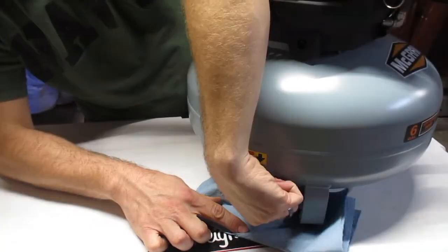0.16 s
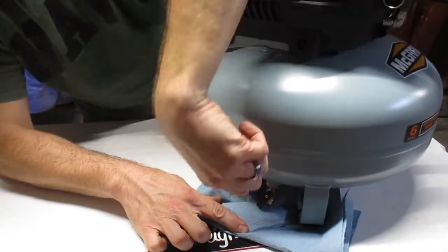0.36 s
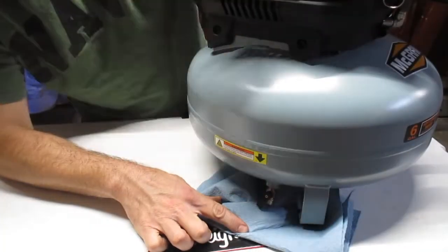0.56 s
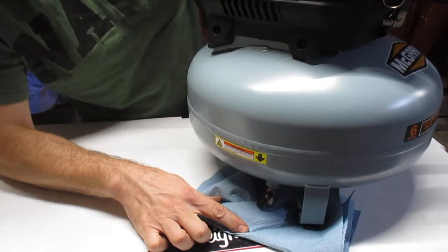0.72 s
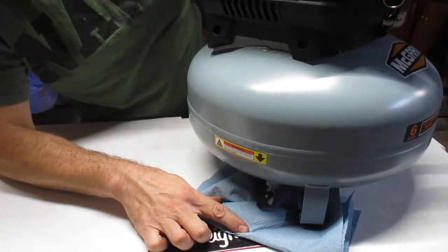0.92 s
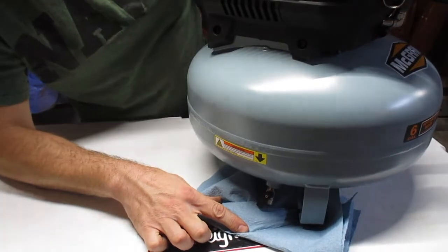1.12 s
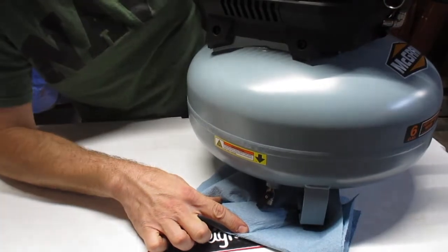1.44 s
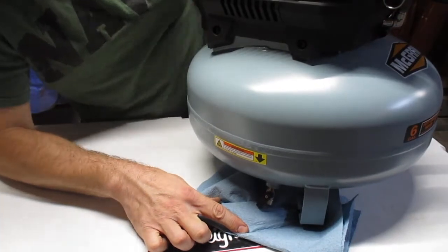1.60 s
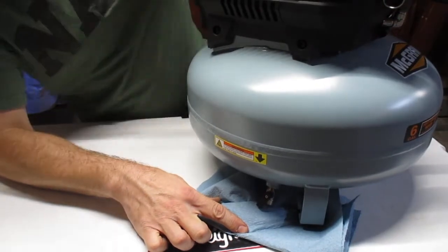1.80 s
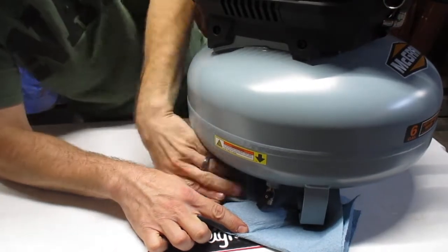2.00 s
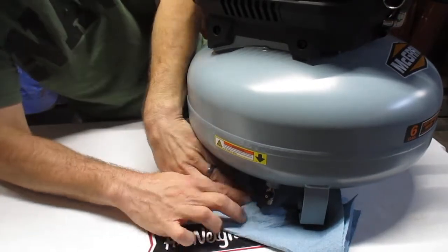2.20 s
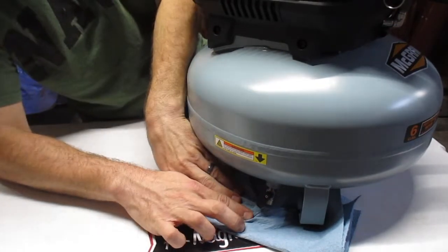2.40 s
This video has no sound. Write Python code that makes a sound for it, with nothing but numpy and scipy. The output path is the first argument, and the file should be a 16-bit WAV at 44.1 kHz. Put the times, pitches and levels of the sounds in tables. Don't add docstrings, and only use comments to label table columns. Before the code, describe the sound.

Bright jet of air escaping a compressor tank, sputtering with clicks and breathy whistles, then fading

```python
import sys
import numpy as np
from scipy import signal
from scipy.io import wavfile

SR = 44100
rng = np.random.default_rng(int(sys.argv[2]) if len(sys.argv) > 2 else 0)


def natural_amplitude(level_db):
    exponent = np.asarray(level_db, float) / 20
    return 10 ** exponent


def master(y):
    cut = np.clip(np.atleast_2d(y).T, -1, 1)
    pcm = np.round(cut * 32767)
    wavfile.write(sys.argv[1], SR, pcm.astype(np.int16))


N = 112454

# t/s, level/dB
JET_LEVEL = [(0, -26.5), (.115, -28.5), (.128, -23), (.155, -21), (.232, -25.5), (.24, -22), (.48, -23),
             (.535, -24), (.55, -23.5), (1.17, -25), (1.2, -20.5), (1.22, -25), (1.58, -26.5),
             (1.61, -27.5), (2.1, -29), (2.42, -30.5), (2.52, -34.5), (2.55, -36)]
# f/Hz, density/dB
JET_SPECTRUM = [(300, -67), (1000, -46), (2200, -30.5), (3000, -7), (4500, -10), (6300, -2.5),
                (10000, -4.5), (15000, -5)]
# f/Hz, added share/dB
SPECTRUM_STEPS = [(2380, 5), (10750, -5)]
# t/s, level/dB
ROAR_LEVEL = [(0, -33), (.11, -38), (.125, -28), (.23, -30.5), (.3, -30), (.8, -33.5), (1.02, -39.5),
              (1.12, -37.5), (1.19, -43.5), (1.23, -40.5), (1.58, -42), (1.605, -51), (1.69, -46.5),
              (2.0, -45.5), (2.2, -47.5), (2.25, -43.5), (2.31, -44.5), (2.35, -54)]
# f/Hz, density/dB
ROAR_SPECTRUM = [(30, -5), (100, -11.5), (250, -5.5), (700, -5), (1500, 0), (2300, 0.5), (4000, 1.5),
                 (8000, -9.5)]
# t/s, peak level/dB, ring weight/dB, thud weight/dB
DROPS = [
    (.2388, -7, -6, -12),
    (1.0622, -13, -8, -6),
    (1.213, -21, -1, 8),
    (1.3735, -7, -7, -5),
    (1.5206, -9, -7, -4),
    (1.6915, -11, -5, 0),
    (1.917, -5, -6, -1),
    (2.1208, -11, -8, -14),
    (2.1322, -3, -1, -12),
]
# f/Hz, level/dB, t60/s
DROP_MODES = [(2420, 0, .0075), (1150, -11, .006), (4600, -2, .0018), (6300, 1, .0025), (9000, -16, .002)]
DROP_MODE_SIGNS = [1, -1, -1, -1, 1]
# delay/s, level/dB
POP_ECHOES = [(.0042, -15), (.0097, -15), (.017, -19), (.026, -22)]
# lower f/Hz, upper f/Hz
POP_ECHO_BAND = (1800, 3000)
# start t/s, length t/s, first f/Hz, last f/Hz, level/dB
ORIFICE_WHISTLES = [(0.237, 0.16, 7700, 6300, -43), (.57, 0.078, 7000, 7400, -28.5),
                    (0.661, 0.3, 7650, 7050, -28), (1.0, 0.071, 7450, 6800, -28.5),
                    (1.065, .32, 7280, 6850, -31), (1.375, 0.19, 7000, 6500, -39),
                    (1.52, 0.082, 7200, 6700, -30), (1.6, 0.1, 6520, 5600, -35.5),
                    (1.694, 0.077, 6750, 6600, -31.5), (1.775, .08, 6500, 5640, -32),
                    (1.845, .065, 5730, 5300, -32), (1.96, 0.045, 6100, 6400, -33),
                    (2.01, 0.022, 9060, 9900, -26), (2.026, 0.034, 9700, 8150, -26.5),
                    (2.232, .04, 2750, 2530, -35.5)]
# start t/s, length t/s, first f/Hz, last f/Hz, level/dB
WATER_SURGES = [(.119, .03, 3300, 2890, -29), (.151, .021, 14000, 6960, -18.5),
                (.238, 0.23, 4000, 2737, -30), (.238, 0.18, 7600, 6040, -25.5),
                (.445, .055, 14500, 14700, -20), (.575, 0.069, 14550, 14470, -22),
                (.67, 0.3, 15000, 13920, -34), (1.14, 0.054, 11500, 12260, -33),
                (1.41, 0.069, 14000, 14450, -32), (1.52, 0.12, 9140, 8930, -32.5),
                (2.235, 0.046, 11200, 11000, -33)]
# t/s, level/dB
GAP_LEVEL = [(0, -60), (.11, -41), (.3, -46), (.4, -28), (.49, -32.5), (.53, -63), (.55, -34), (.8, -38),
             (1.16, -36.5), (1.33, -42.5), (1.68, -41), (1.7, -38.5), (1.9, -45), (2.02, -35.5), (2.1, -48),
             (2.55, -50)]
# f/Hz, width f/Hz, level/dB, share of the level's swing
GAP_MODES = [(2647, 520, 0, 1.0), (3980, 540, -5, 1)]
# start t/s, length t/s, first f/Hz, last f/Hz, level/dB
FOLD_HUMS = [
    (.9, 0.73, 1444, 1406, -44.5),
    (1.31, .07, 1420, 1335, -43),
    (1.62, 0.056, 1342, 1425, -47),
    (1.692, 0.18, 1406, 1368, -44.5),
    (1.92, 0.08, 1350, 1374, -46),
    (1.98, .06, 1355, 1480, -41),
    (2.165, 0.064, 1410, 1475, -50),
    (2.47, 0.065, 1424, 1400, -70),
]
# delay/s, level/dB
NEAR_WALLS = [(.0013, -31), (.0031, -23), (.0058, -25.5), (.0094, -20.5), (.0147, -15.5)]


def rms_one(x):
    return x / np.sqrt(np.mean(np.abs(x) ** 2) + 1e-20)


def in_time(rows):
    t, value = np.transpose(rows)
    return np.interp(np.arange(N) / SR, t, value)


def filtered(x, order, hz, kind):
    return signal.sosfilt(signal.butter(order, hz, kind, fs=SR, output="sos"), x)


def with_delays(x, reflected, table):
    return x + sum(natural_amplitude(db) * np.roll(reflected, int(delay * SR)) for delay, db in table)


def drift(rate_hz):
    every = 40
    r = np.exp(-2 * np.pi * every * rate_hz / SR)
    white = rng.standard_normal(N // every + 2002)
    slow = signal.lfilter([1], [1, -2 * r, r * r], white)[2000:]
    return np.interp(np.arange(N) / every, np.arange(len(slow)), rms_one(slow))


def narrow_noise(hz, width_hz):
    r = np.exp(-np.pi * width_hz / SR)
    white = rng.standard_normal((2, len(hz) + 500))
    re, im = signal.lfilter([1], [1, -2 * r, r * r], white)[:, 500:]
    carrier = np.exp(2j * np.pi * np.cumsum(hz) / SR)
    return np.sqrt(2) * (rms_one(re + 1j * im) * carrier).real


def turbulence(spectrum, gust_db, patchy_db, flicker_db, weak_db=0):
    bass_loss, bass_knee_hz = 0.33, 604
    edges = 25 * 2 ** np.arange(0, 9.6, 1 / 3)
    white = rng.standard_normal((2, N))
    gust = drift(18.5)
    patch = [drift(19.6) for _ in edges]
    hz, db = np.transpose(spectrum)
    out = 0
    for k, (low, high) in enumerate(zip(edges, edges[1:])):
        band = filtered(white[k % 2], 2, [low, high], "band")
        level_db = np.interp(np.log(low * high) / 2, np.log(hz), db)
        level_db = level_db + bass_loss * weak_db * max(np.log2(bass_knee_hz / low), 0)
        level_db = level_db + gust_db * gust + patchy_db * (patch[k] + patch[k + 1])
        out = out + band * natural_amplitude(level_db + flicker_db * drift(20.0))
    return rms_one(out)


def gliding_noise(table, width, release_s):
    attack_s = .003
    out = np.zeros(N + SR)
    waver = drift(40.0)
    flutter = natural_amplitude(1.2 * drift(30.0))
    for start, length, first_hz, last_hz, db in table:
        i = int(start * SR)
        t = np.arange(int(length * SR)) / SR
        glide_hz = first_hz + (last_hz - first_hz) * t / length
        hz = glide_hz * (1 + .008 * waver[i:i + len(t)])
        fall = (length - t) / min(release_s, length / 2)
        shape = np.clip(np.minimum(t / attack_s, fall), 0, 1)
        width_hz = width * (first_hz + last_hz) / 2
        out[i:i + len(t)] += natural_amplitude(db) * shape * narrow_noise(hz, width_hz)
    return out[:N] * flutter


def jet():
    hiss = turbulence(JET_SPECTRUM, gust_db=0.08, patchy_db=0.27, flicker_db=.9)
    for hz, db in SPECTRUM_STEPS:
        edge = signal.butter(8, hz, "high", fs=SR, output="sos")
        hiss = hiss + natural_amplitude(db) * signal.sosfiltfilt(edge, hiss)
    return natural_amplitude(in_time(JET_LEVEL) + 3.09) * rms_one(hiss)


def towel_roar():
    level_db = in_time(ROAR_LEVEL)
    weak_db = level_db - level_db.max()
    roar = turbulence(ROAR_SPECTRUM, gust_db=1.35, patchy_db=0.59, flicker_db=0.66, weak_db=weak_db)
    return natural_amplitude(level_db + 5) * roar


def drop_pops():
    gain_db, cut_hz = -5, 450
    t, db, *weights_db = np.transpose(DROPS)
    out = np.zeros(N)
    for k, (hz, mode_db, t60) in enumerate(DROP_MODES):
        weight = natural_amplitude(weights_db[k]) if k < 2 else 1
        clicks = np.full(N, 1e-18)
        clicks[(t * SR).astype(int)] = natural_amplitude(db + gain_db + mode_db) * DROP_MODE_SIGNS[k] * weight
        r = natural_amplitude(-60 / (t60 * SR))
        w = 2 * np.pi * hz / SR
        out += signal.lfilter([0, np.sin(w)], [1, -2 * r * np.cos(w), r * r], clicks)
    out = filtered(out, 3, cut_hz, "high")
    dull = filtered(out, 1, POP_ECHO_BAND, "band")
    return with_delays(out, dull, POP_ECHOES)


def orifice_whistles():
    return gliding_noise(ORIFICE_WHISTLES, width=.075, release_s=.015)


def water_surges():
    return gliding_noise(WATER_SURGES, width=0.25, release_s=0.036)


def tank_gap():
    level_db = in_time(GAP_LEVEL)
    mean_db = level_db.mean()
    out = np.zeros(N)
    for hz, width_hz, db, share in GAP_MODES:
        mode_db = db + mean_db + share * (level_db - mean_db) + 1.1 * drift(7.1)
        out += natural_amplitude(mode_db) * narrow_noise(np.full(N, float(hz)), width_hz)
    return out


def towel_fold():
    return gliding_noise(FOLD_HUMS, width=0.19, release_s=.015)


def garage():
    hum = narrow_noise(np.full(N, 125.5), 7.4)
    hush = rms_one(signal.lfilter([1], [1, -.93], rng.standard_normal(N)))
    return natural_amplitude(-84) * hum + natural_amplitude(-76) * hush


def scene():
    air = jet() + towel_roar() + orifice_whistles() + water_surges() + tank_gap() + towel_fold()
    air = natural_amplitude(-1.0) * with_delays(air, air, NEAR_WALLS)
    return np.tile(air + drop_pops() + garage(), (2, 1))


def top_cut(x):
    return signal.sosfilt(signal.butter(12, 16280, fs=SR, output="sos"), x)


def record(dry):
    mic_cut_hz, top_hz, fade_s = 64, 15740, .002
    t = np.arange(N) / SR
    mic = filtered(dry, 2, mic_cut_hz, "high")
    cut = signal.sosfilt(signal.cheby2(40, 80, top_hz + 130, fs=SR, output="sos"), mic)
    fade = np.clip(np.minimum(t, t[-1] - t) / fade_s, 0, 1)
    return top_cut(cut * fade)


dry = scene()
out = record(dry)
master(out)
```